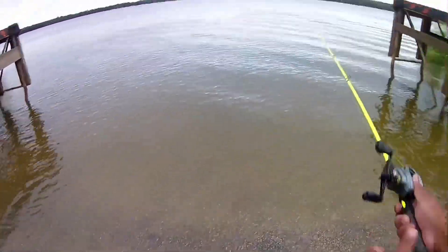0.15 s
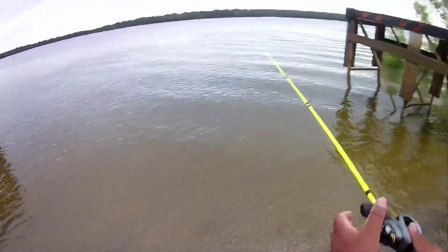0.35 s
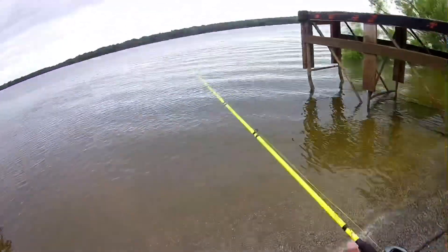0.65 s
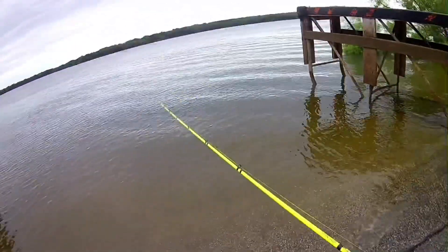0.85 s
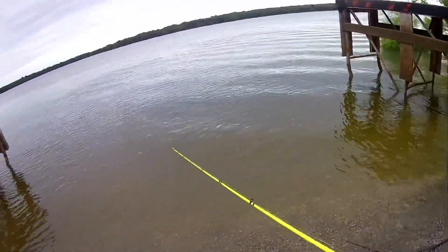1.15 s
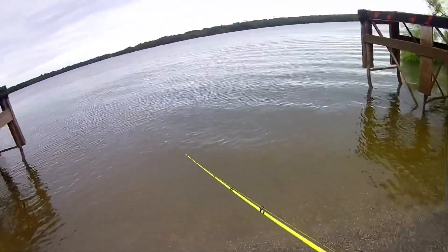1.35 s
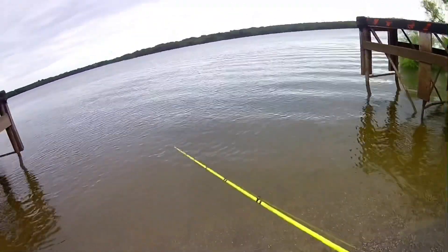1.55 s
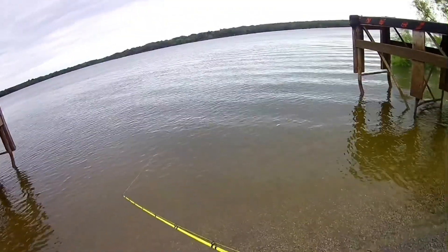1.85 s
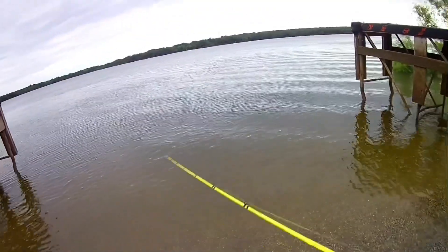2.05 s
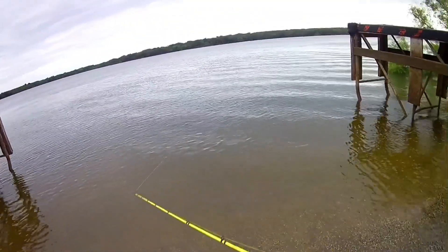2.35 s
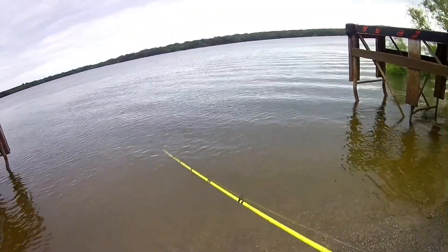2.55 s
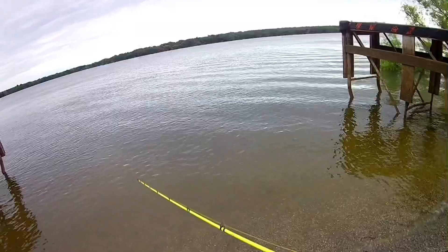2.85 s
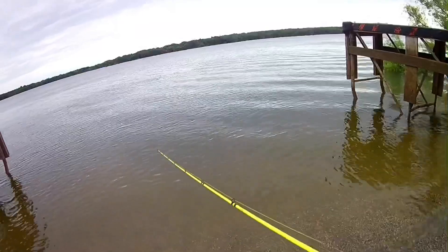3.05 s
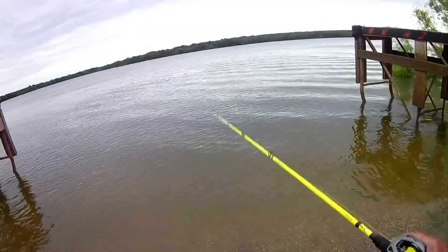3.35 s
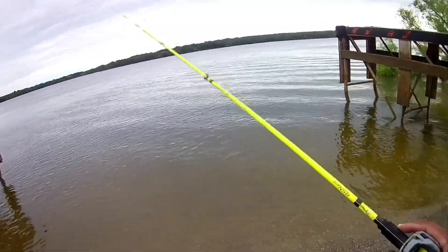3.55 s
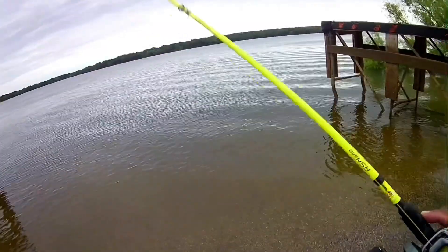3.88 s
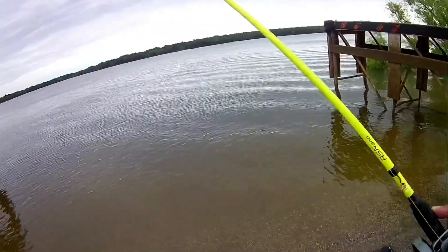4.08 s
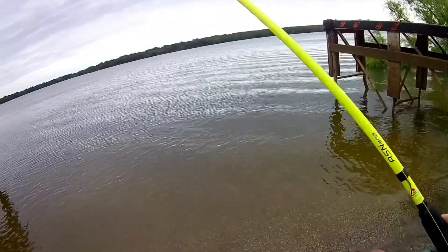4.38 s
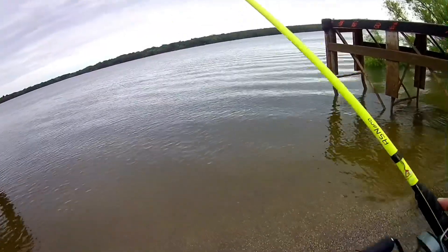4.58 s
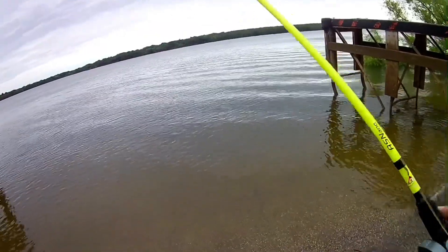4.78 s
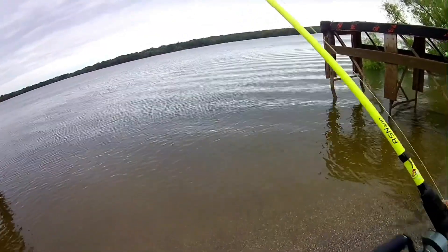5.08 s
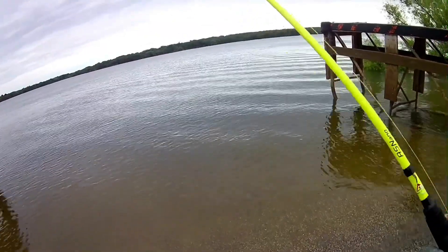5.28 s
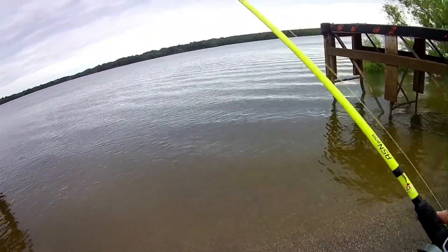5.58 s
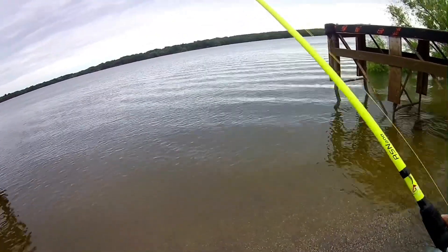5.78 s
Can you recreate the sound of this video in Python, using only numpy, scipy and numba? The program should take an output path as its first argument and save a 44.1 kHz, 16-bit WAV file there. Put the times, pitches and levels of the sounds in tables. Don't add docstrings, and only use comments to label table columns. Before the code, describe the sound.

Small waves lap at a gravel lake shore throughout, close to the microphone. Each one traps air that gulps and gurgles at low-mid pitch, with smaller bubbles pattering above and a thin fizz of droplets draining away. A splashy lap opens the scene. Faint touches around 0.56 s lead to a sharp, loud clack at 0.58 s as a fishing reel engages, with a bright rebound and tiny rattle over by 0.62 s. Further laps come at about 0.7, 1.45, 2.0 (strong and bubbly), 2.6, 3.25, 3.7, 4.35, 4.8 and 5.5 s, with quieter gaps holding single plops and ticks of spray. Low wind rumbles steadily, with a gust and soft deep thumps from 0.9 to 1.9 s. Near 5.9 s comes a soft reel click and thud and a faint high, rising squeak, cut off by the end. The sound is slightly muffled, with thin, uneven treble and little echo.

```python
import sys
import numpy as np
from scipy import signal
from scipy.fft import rfft, irfft, next_fast_len
from scipy.io import wavfile
from scipy.ndimage import uniform_filter1d, map_coordinates
from numba import njit

SR = 44100
rng = np.random.default_rng(int(sys.argv[2]) if len(sys.argv) > 2 else 0)


def elevation(decibels):
    levels = np.asarray(decibels, float)
    return 10 ** (levels / 20)


def digitize_waveform(pressure):
    field = np.atleast_2d(pressure).T
    bounded = np.clip(field, -1, 1)
    quanta = np.round(bounded * 32767).astype(np.int16)
    wavfile.write(sys.argv[1], SR, quanta)


N = 261071
TYPICAL_DB = -43

# start in seconds, strength in dB, length in seconds, spray in dB.
WAVES = [(-.05, -41.5, 0.21, 2.5), (0.074, -39.5, 0.038, -12), (0.358, -52, 0.174, 0),
         (0.671, -40.5, .22, 2.5), (0.998, -49, 0.089, 0.5), (1.188, -45, 0.095, 2),
         (1.327, -45, 0.066, -2), (1.449, -43, 0.12, 0), (1.838, -49, .1, 3), (2.003, -39.5, 0.21, 2),
         (2.309, -52.5, 0.053, 2.5), (2.4, -47, 0.13, 1.5), (2.599, -42, 0.12, 0), (2.886, -47.5, 0.065, 2),
         (3.066, -54, 0.147, 1.5), (3.247, -44, 0.33, 0), (3.702, -40, 0.16, 2.5),
         (3.976, -48, 0.0974, -2.5), (4.24, -54, .04, 0.5), (4.348, -41, 0.24, 0),
         (4.777, -40.5, 0.26, -0.5), (5.218, -53, 0.043, -4), (5.4, -53, .05, 2.5), (5.49, -45, 0.2, -2)]
# start in seconds, peak in dB, pitch in Hz, life in cycles.
GULPS = [(.083, -21.5, 375, 6.1), (.088, -26, 295, 4.5), (.118, -27.5, 319, 3.7), (.696, -29.5, 316, 6.3),
         (.699, -29, 285, 12.7), (.734, -30, 297, 14.5), (.77, -34.5, 375, 16.8), (1.47, -39, 406, 17),
         (1.541, -33, 451, 4.2), (2.006, -17.5, 318, 3.1), (2.034, -32.5, 346.3, 16.6),
         (2.035, -30.5, 278, 9.9), (2.045, -34, 389, 11.5), (2.122, -32.5, 497, 7.8),
         (2.159, -34.5, 480, 4.5), (2.169, -32.5, 479, 17), (2.197, -33.5, 427, 4),
         (2.49, -40, 311.8, 16.3), (2.612, -23.5, 367, 7.8), (3.338, -25, 300, 1.46),
         (3.643, -29.5, 480, 4.3), (3.707, -35, 281.8, 8), (3.75, -30, 330, 5.3),
         (4.393, -26.5, 419.3, 3.6), (4.43, -34.5, 294.7, 10.5), (4.499, -29, 476, 5.2),
         (4.515, -40, 408.7, 17), (4.784, -29, 328, 6.48), (4.809, -35, 386, 15), (4.864, -32.5, 412, 13.5)]
# start in seconds, peak in dB, pitch in Hz, life in cycles.
BUBBLES = [(.024, -24, 840, 2.15), (.136, -29, 533, 3), (.791, -24.5, 571, 3.53), (.791, -26.5, 750, 5.3),
           (.834, -32, 710, 9.8), (.854, -29.5, 502.5, 11.6), (.879, -39.5, 833, 5.5),
           (1.226, -28.5, 596, 4.8), (1.242, -35, 918.6, 14), (2.034, -22, 566, 4.5),
           (2.083, -28.5, 695, 3.8), (2.71, -30.5, 621, 8.1), (2.883, -34, 760, 16.9),
           (3.343, -27.5, 645, 4.9), (3.347, -23, 672, 6.6), (3.436, -32.5, 607, 8.1),
           (3.509, -28, 518, 4.7), (3.796, -34, 933, 6.9), (3.815, -32, 917, 13), (3.993, -25.5, 661, 5.2),
           (4.398, -27.5, 755, 3.1), (4.418, -19, 733, 1.4), (4.498, -39, 727, 18),
           (4.799, -27.5, 753, 5.1), (4.822, -24.5, 882, 4.3), (4.876, -26.5, 885, 5.07),
           (5.03, -27.5, 627, 7.3), (5.601, -33, 775, 10.5), (5.693, -26.5, 750, 3.56),
           (5.737, -31.5, 739.5, 8.2)]
# start in seconds, peak in dB, pitch in Hz, life in cycles.
BURBLES = [(0.091, -34.0, 1004.0, 8.3), (0.138, -30.0, 631.0, 3.0), (0.153, -29.0, 488.0, 3.3),
           (0.629, -38.0, 1521.0, 3.2), (0.671, -37.0, 1148.0, 7.7), (0.792, -33.0, 1033.0, 11.7),
           (0.802, -27.0, 430.0, 5.5), (0.849, -37.0, 1492.0, 3.2), (0.875, -26.0, 516.0, 3.0),
           (0.879, -30.0, 832.0, 3.0), (1.347, -34.0, 1004.0, 3.0), (1.487, -29.0, 488.0, 4.0),
           (1.541, -28.0, 430.0, 3.0), (2.031, -33.0, 1177.0, 7.9), (2.039, -30.0, 976.0, 5.1),
           (2.069, -27.0, 373.0, 8.8), (2.11, -34.0, 1521.0, 5.6), (2.13, -27.0, 545.0, 7.0),
           (2.142, -25.0, 488.0, 14.4), (2.154, -31.0, 1291.0, 8.7), (2.186, -34.0, 1004.0, 3.7),
           (2.189, -24.0, 516.0, 5.0), (2.328, -44.0, 1894.0, 6.9), (2.614, -29.0, 717.0, 3.0),
           (2.62, -36.0, 1607.0, 5.9), (2.701, -37.0, 1435.0, 3.1), (3.476, -38.0, 1607.0, 3.4),
           (3.705, -36.0, 1148.0, 7.7), (3.71, -39.0, 1406.0, 9.4), (3.746, -38.0, 1722.0, 15.0),
           (3.75, -31.0, 832.0, 11.9), (3.761, -34.0, 1435.0, 7.4), (3.885, -36.0, 1550.0, 8.0),
           (3.892, -33.0, 947.0, 6.4), (4.339, -37.0, 1435.0, 5.2), (4.362, -32.0, 344.0, 5.5),
           (4.401, -44.0, 1866.0, 4.0), (4.438, -37.0, 1579.0, 8.2), (4.456, -38.0, 1722.0, 3.7),
           (4.482, -35.0, 1693.0, 8.8), (4.537, -37.0, 1464.0, 5.4), (4.658, -43.0, 1866.0, 4.0),
           (4.833, -38.0, 1579.0, 5.8), (4.833, -33.0, 1378.0, 9.2), (4.867, -24.0, 430.0, 3.0),
           (4.877, -37.0, 1665.0, 6.1), (5.059, -37.0, 1320.0, 14.9), (5.608, -29.0, 861.0, 8.4)]
# start in seconds, peak in dB, pitch in Hz, life in cycles.
PIPS = [(.021, -33, 1316, 12.6), (.045, -19.5, 1103, 2.5), (.223, -34.5, 1137, 5.2),
        (.862, -33.5, 1015, 3.5), (.868, -32.5, 1440, 4.2), (1.108, -29, 1360, 2.9),
        (1.969, -36, 1680, 10.6), (2.0, -29, 1590, 6.4), (2.056, -23.5, 1227, 9.4), (2.151, -37, 1270, 10),
        (2.682, -34, 1230, 9.8), (2.716, -33.5, 1670, 4), (3.664, -29.5, 1413, 5.1),
        (3.732, -35.5, 1770, 12), (3.754, -22.5, 1430, 1.58), (3.844, -23.5, 1480, 1.95),
        (4.34, -29, 1100, 2.7), (4.386, -33.5, 1452, 9.3), (4.457, -32.5, 1560, 4.2),
        (4.558, -28, 1136, 3.5), (4.785, -26.5, 1620, 5.1), (4.788, -33, 1324, 8.5),
        (4.802, -30.5, 1255, 7.3), (4.875, -30.5, 1233, 5.8), (5.417, -36.5, 1302, 9.6),
        (5.544, -37.5, 1191, 13)]
# start in seconds, peak in dB, pitch in Hz, life in cycles.
DROPLETS = [(.034, -34, 2600, 3.7), (.099, -38.5, 2750, 4.8), (.209, -25.5, 3264, 3.1),
            (.257, -43.5, 3330, 7.4), (.733, -36, 2380, 5.6), (.869, -32, 2254, 2.3),
            (1.054, -43.5, 3704, 10.8), (1.2, -44.5, 4340, 19), (1.68, -38.5, 3100, 4.8),
            (2.038, -41.5, 2053, 11.2), (2.068, -31.5, 2140, 3.9), (2.115, -35, 2130, 9),
            (2.267, -41, 3690, 5.1), (2.32, -44, 2870, 12.4), (2.853, -45.5, 2327, 20.5),
            (3.007, -41.5, 2890, 8), (3.25, -33.5, 5600, 2.6), (3.779, -46.5, 5440, 16),
            (3.796, -32, 3960, 4.66), (3.838, -34.5, 2943, 3.1), (4.355, -43.5, 2830, 11),
            (4.786, -39.5, 2886, 6.1), (5.095, -43, 4640, 6)]
# start in seconds, peak in dB, pitch in Hz, life
PLOPS = [(0.988, -39, 290, 4.6), (1.02, -32.5, 535, 6.5), (1.79, -41, 755.5, 8.4), (1.89, -33, 875, 11.3),
         (2.451, -32, 610, 3.3), (2.934, -34, 346, 5.04), (3.066, -35, 697.6, 6.8),
         (3.155, -32.5, 525.5, 4.8), (3.234, -29, 683, 3.5), (3.287, -32, 391, 2.96), (3.545, -27, 673, 4),
         (4.273, -25, 620, 2.0), (4.659, -19, 600, 1.5), (4.698, -31.5, 283, 3.2), (4.945, -28.5, 558, 2.7),
         (5.211, -26, 612, 3.2), (5.248, -33, 616, 7.85), (5.717, -27, 750, 2.6), (1.32, -34, 390, 8),
         (1.368, -30, 620, 5), (1.41, -31, 900, 5), (1.525, -32, 700, 6), (1.595, -32, 710, 5),
         (2.862, -34, 770, 10), (3.178, -33, 520, 8), (3.272, -33, 1020, 8), (3.452, -29, 760, 4),
         (4.428, -30, 600, 5), (4.585, -31, 450, 6), (5.478, -34, 920, 5), (5.508, -30, 470, 5),
         (5.57, -32, 470, 7), (5.655, -33, 450, 6)]
# start in seconds, peak in dB, pitch in Hz.
TICKS = [(0.4695, -44, 4260), (0.5423, -43, 2650), (0.849, -54, 2600), (1.0081, -52, 2510),
         (1.1703, -47, 4640), (1.2006, -39, 4440), (1.3001, -45.5, 5470), (1.548, -44.5, 2790),
         (1.5783, -53, 2590), (1.734, -55.5, 2780), (1.851, -48, 4650), (2.0333, -49, 3040),
         (2.2239, -46, 2530), (2.2394, -49.5, 3700), (2.3208, -48.5, 2810), (2.3844, -50, 2960),
         (2.4528, -61, 3900), (2.6025, -58.5, 2640), (3.7384, -55.5, 2695), (4.0317, -56, 2960),
         (4.087, -41.5, 2730), (4.6483, -54.5, 2660), (4.8823, -50, 3160), (5.4256, -39.5, 2700),
         (5.626, -46, 3010), (5.7079, -51, 2610)]
# start in seconds, peak in dB, pitch in Hz.
SPITS = [(0.161, -49.0, 5742.0), (0.196, -61.0, 6660.0), (0.208, -48.0, 5282.0), (0.21, -55.0, 6431.0),
         (0.499, -49.0, 4478.0), (0.719, -44.0, 4364.0), (0.733, -41.0, 4249.0), (0.754, -45.0, 3904.0),
         (0.848, -46.0, 4019.0), (0.873, -45.0, 4364.0), (1.163, -61.0, 6775.0), (1.17, -47.0, 4593.0),
         (1.2, -50.0, 5857.0), (1.2, -38.0, 4364.0), (1.3, -55.0, 6660.0), (1.579, -47.0, 4708.0),
         (1.851, -48.0, 4708.0), (1.89, -48.0, 4478.0), (1.929, -49.0, 5053.0), (1.968, -48.0, 5397.0),
         (1.999, -32.0, 2067.0), (2.033, -44.0, 3445.0), (2.063, -60.0, 6890.0), (2.076, -60.0, 6890.0),
         (2.117, -56.0, 6660.0), (2.12, -42.0, 4019.0), (2.155, -50.0, 6201.0), (2.173, -56.0, 6660.0),
         (2.179, -36.0, 2067.0), (2.187, -59.0, 6660.0), (2.223, -42.0, 2985.0), (2.239, -43.0, 3445.0),
         (2.28, -49.0, 6546.0), (2.38, -37.0, 2182.0), (2.454, -46.0, 4019.0), (2.528, -50.0, 6546.0),
         (2.603, -48.0, 3560.0), (2.666, -48.0, 5512.0), (2.86, -51.0, 5053.0), (3.071, -50.0, 4823.0),
         (3.298, -50.0, 5167.0), (3.327, -49.0, 5167.0), (3.583, -45.0, 3904.0), (3.741, -47.0, 6086.0),
         (3.754, -48.0, 5512.0), (3.771, -46.0, 4249.0), (3.811, -36.0, 2067.0), (3.839, -47.0, 5397.0),
         (4.806, -46.0, 4249.0), (5.02, -48.0, 3560.0)]
# start in seconds, peak in dB, brightness in dB, thud in dB.
REEL_CLICKS = [
    (.559, -41, -1.5, -14),
    (.566, -39, -1, -15.5),
    (.571, -37, -3, -14),
    (0.5745, -29, 1.5, -7.5),
    (.5829, -3.3, -14, 0),
    (.5858, -14, 0, -13),
    (0.606, -35, 4.5, -15),
    (0.6069, -24, -1, -2),
    (5.899, -42, -3, -15),
    (5.912, -35.5, -12, 9.5),
]
# pitch in Hz, level in dB, 60 dB decay in seconds.
REEL_MODES = [(700, 0, .0095), (1000, -8, .009), (2100, -7, .008), (2500, -2, .011), (3200, -7, .007),
              (3750, -7, .008), (4300, 0, .008), (5200, -6, .006), (6850, -10, .012), (7600, -20, .012),
              (9000, -16, .009), (10100, -12, .011), (11100, -20, .014)]
# time in seconds, level in dB, pitch in Hz.
SQUEAK = [
    (5.895, -70, 5370),
    (5.904, -51, 5320),
    (5.907, -74, 5370),
    (5.91, -48, 5347),
    (5.92, -38, 5414),
]
# time in seconds, level in dB.
WIND = [
    (0, -42),
    (.9, -43),
    (1.4, -40.5),
    (1.9, -42),
    (2.8, -42.5),
    (5.4, -42.5),
    (5.92, -43.5),
]
# start in seconds, peak in dB, pitch in Hz.
THUMPS = [
    (0.919, -31.5, 47.2),
    (1.091, -27.5, 35.7),
    (1.448, -25.5, 56.5),
    (1.847, -28, 43.5),
]
# frequency in Hz, density in dB per Hz.
RUMBLE = [(8.8, -28), (15, -6.5), (54, 2), (67, -0.5), (107, -8), (140, -7), (200, -17.5), (260, -19.5),
          (380, -22), (600, -45)]
# frequency in Hz, density in dB per Hz.
FAR_SHORE = [(150, -120), (230, -10), (400, -8), (700, 1.5), (1000, -2.5), (1600, -21.5), (2100, -14.5),
             (4500, -27.5), (7000, -28), (10000, -31), (15700, -38)]
# frequency in Hz, gain in dB.
HOUSING = [(20, -4), (1750, 0.5), (2050, -5.5), (2550, -1.5), (3200, -4.5), (4400, -0.5), (4900, -3.5),
           (5600, 1.5), (6150, -3.5), (6900, -6), (7500, -11), (8100, -13), (8700, -8.5), (15700, -17.5)]
# frequency in Hz, density in dB per Hz.
HISS = [(5000, -120), (6000, -14), (8000, -1.5), (10000, 1.5), (12000, -1.5), (13500, -3), (15700, -2.5)]


@njit
def ring(start, gain, hz, cycles, rise, n, sr):
    out = np.zeros(n)
    for k in range(len(start)):
        life = cycles[k] / hz[k]
        for i in range(min(int(3 * life * sr), n - start[k])):
            t = i / sr
            shape = (1 - np.exp(-t * hz[k])) * np.exp(-t / life) * (1 - (t / (3 * life)) ** 4)
            glide_t = t + rise[k] * t * t / (2 * life)
            out[start[k] + i] += gain[k] * shape * np.sin(2 * np.pi * hz[k] * glide_t)
    return out


def pockets(s, db, hz, cycles, rise):
    start = (np.clip(s, 0, None) * SR).astype(np.int64)
    cycles = np.full(len(s), cycles, dtype=float)
    rise = np.full(len(s), rise, dtype=float)
    return ring(start, elevation(db), hz, cycles, rise, N, SR)


def bubbles():
    s, db, hz, cycles = np.transpose(PLOPS)
    out = pockets(s, db - 3.0, 0.95 * hz, cycles, rise=0.1)
    s, db, hz, cycles = np.transpose(BURBLES)
    out = out + pockets(s, db - 5, hz, cycles, rise=0.04)
    for rows, rise in (GULPS, 0.078), (BUBBLES, 0.083), (PIPS, 0.016), (DROPLETS, 0.013):
        out = out + pockets(*np.transpose(rows), rise)
    return out


def waves():
    gurgle_db = wash(calm_db=-54.5, offset_db=-0.5, strength=1.17, spray_share=-0.18,
                     rise_s=0.0037, drain_s=0.34)
    patter_db = wash(calm_db=-61, offset_db=-9.5, strength=0.8479, spray_share=0.46,
                     rise_s=0.0074, drain_s=0.88)
    fizz_db = wash(calm_db=-70, offset_db=-23, strength=0.6238, spray_share=1.44,
                   rise_s=0.1551, drain_s=0.8)
    surge = wobble(22.037)
    gurgle = elevation(gurgle_db - 2.2 + 1.52 * surge) * swarm(
        count=5500, centre_hz=630, octaves=0.5, cycles=3.6, rise=0.06, scatter_db=2.5, ageing=1)
    patter = elevation(patter_db - 1.0 + 1.22 * surge) * swarm(
        count=5500, centre_hz=1444, octaves=0.371, cycles=3.2, rise=0.031, scatter_db=2.5, ageing=0.091)
    fizz = elevation(fizz_db - 1.0 + 2.0 * surge + 1.5 * wobble(9)) * swarm(
        count=11000, centre_hz=3428.6, octaves=0.5, cycles=3.5, rise=0.011, scatter_db=3.6, ageing=0)
    far = elevation(-57.5 + 1.19 * (fizz_db + 68)) * rush(FAR_SHORE, patchy_db=2.3)
    return gurgle + patter + fizz + far


def wash(calm_db, offset_db, strength, spray_share, rise_s, drain_s):
    t, power = np.arange(N) / SR, elevation(2 * calm_db)
    for s, db, length, spray_db in WAVES:
        peak_db = TYPICAL_DB + offset_db + strength * (db - TYPICAL_DB) + spray_share * spray_db
        drained_db = 60 * np.clip(t - s - length, 0, None) / drain_s
        before_db = 20 * np.clip(s - t, 0, None) / rise_s
        power = power + elevation(2 * (peak_db - drained_db - before_db))
    return 10 * np.log10(power)


def swarm(count, centre_hz, octaves, cycles, rise, scatter_db, ageing):
    u, g = rng.random((count, 2)), rng.standard_normal((count, 3))
    hz = np.clip(centre_hz * 2 ** (octaves * g[:, 0]), 370, 7000)
    hz = hz * climb(u[:, 0] * N / SR) ** ageing
    size_db = scatter_db * np.minimum(-np.log(1 - u[:, 1]), 4)
    lives = cycles * np.exp(0.503 * g[:, 1])
    return unit(pockets(u[:, 0] * (N - 1) / SR, size_db, hz, lives, rise * (1 + g[:, 2])))


def climb(s):
    starts, db = np.transpose(sorted(WAVES))[:2]
    latest = np.clip(np.searchsorted(starts, s) - 1, 0, None)
    depth = np.clip((db[latest] + 53) / 9, 0, 1)
    age_s = np.abs(s - starts[latest])
    return 2 ** (0.898 * (0.5 - depth * np.exp(-age_s / 0.19945)))


def spray():
    s, db, hz = np.transpose(TICKS)
    ticks = pockets(s, db + 6, hz, cycles=2.3, rise=0)
    s, db, hz = np.transpose(SPITS)
    return ticks + pockets(s, db + 0.5, hz, cycles=5.5, rise=0)


def reel():
    out, t = np.zeros(N + SR), np.arange(SR // 10) / SR
    for s, db, bright_db, thud_db in REEL_CLICKS:
        hit = np.zeros(len(t))
        for hz, level, t60 in REEL_MODES:
            part_db = level + (thud_db if hz < 1500 else bright_db) + rng.normal(0, 1)
            hit += elevation(part_db - 60 * t / t60) * np.sin(2 * np.pi * hz * t)
        noise = uniform_filter1d(rng.standard_normal(len(t)), size=6)
        noise = np.diff(uniform_filter1d(noise, size=4), prepend=0)
        hit += elevation(bright_db + 10 - 60 * t / 0.012) * noise
        out[round(s * SR):][:len(t)] -= elevation(db) * hit * (1 - np.exp(-t / 0.00039))
    squeak_db, squeak_hz = curves(SQUEAK)
    squeak = elevation(squeak_db + 2.5) * np.sin(2 * np.pi * np.cumsum(squeak_hz) / SR)
    bass_cut = signal.butter(2, 330, "high", fs=SR, output="sos")
    return signal.sosfilt(bass_cut, out[:N]) + squeak * (np.arange(N) > SQUEAK[0][0] * SR)


def shore(x):
    t = np.arange(SR // 8) / SR
    tail = rng.standard_normal(len(t)) * elevation(-60 * t / 0.14) * (t > 0.003)
    return signal.fftconvolve(x, tail / np.linalg.norm(tail))[:N]


def wind():
    rumble = elevation(curves(WIND)[0] + 0.33 * wobble(13)) * rush(RUMBLE, patchy_db=-0.84)
    s, db, hz = np.transpose(THUMPS)
    return rumble + pockets(s, db + 14.0, hz, cycles=0.8, rise=0)


def hiss(x):
    loud = np.sqrt(np.abs(uniform_filter1d(x ** 2, size=int(0.022 * SR), axis=-1)))
    swell = (np.minimum(loud, elevation(-28.5)) / elevation(TYPICAL_DB)) ** 1.4
    return x + elevation(-52 + TYPICAL_DB) * swell * rush(HISS, patchy_db=2.5)


def thin_treble(x):
    frame = dict(window="cosine", nperseg=2048, noverlap=1024)
    hz, _, z = signal.stft(x, SR, **frame)
    local = np.sqrt(np.abs(uniform_filter1d(np.abs(z) ** 2, size=40, axis=-2)))
    mood = np.repeat(rng.standard_normal((33, z.shape[-1])), 32, axis=0)[:len(hz)]
    mood = uniform_filter1d(mood, size=2, axis=1)
    bar_db = np.interp(hz, [3000, 4500, 6000, 8000, 9500], [-30, -5, 1.8, 1.8, 1.5])
    bar_db = bar_db[:, None] + 1.9 * mood
    return signal.istft(z * (np.abs(z) > local * elevation(bar_db)), SR, **frame)[1][..., :N]


def unit(x):
    return x / np.sqrt(np.mean(x ** 2) + 1e-20)


def curves(rows):
    s, *cols = np.transpose(rows)
    return [np.interp(np.arange(N) / SR, s, c) for c in cols]


def wobble(rate):
    return map_coordinates(rng.standard_normal(int(N * rate / SR) + 4), [np.arange(N) * rate / SR])


def rush(spectrum, patchy_db):
    z = signal.stft(rng.standard_normal(N), nperseg=512)[2]
    field = uniform_filter1d(rng.standard_normal(z.shape), size=5, axis=0)
    field = uniform_filter1d(field, size=8, axis=1)
    patchy = signal.istft(z * elevation(patchy_db * unit(field)), nperseg=512)[1][:N]
    return unit(shaped(patchy, spectrum))


def shaped(x, points):
    m = next_fast_len(N + 8192)
    hz, db = np.transpose(points)
    colour = np.interp(np.log(np.fft.rfftfreq(m, 1 / SR) + 1), np.log(hz + 1), db, right=-120)
    return irfft(rfft(x, m) * elevation(colour), m)[..., :N]


def scene():
    near, gear = bubbles() + spray(), reel()
    echo = shore(elevation(-17) * gear + elevation(-10) * near)
    return (near + gear + echo + waves() + wind())[None]


def roll_off(x):
    return signal.sosfilt(signal.butter(12, 15640, fs=SR, output="sos"), x)


def record(dry):
    housed = shaped(dry, HOUSING)
    mix = thin_treble(hiss(housed))
    return roll_off(mix)


dry = scene()
out = record(dry)
digitize_waveform(out)
```